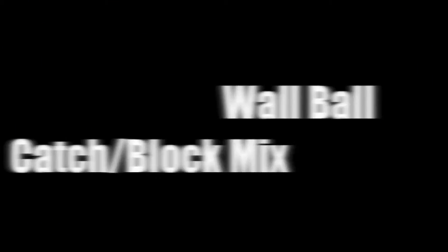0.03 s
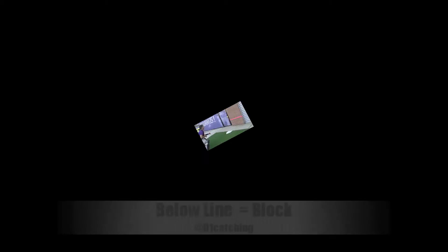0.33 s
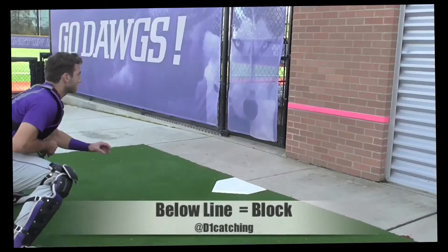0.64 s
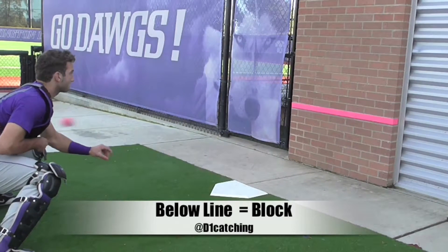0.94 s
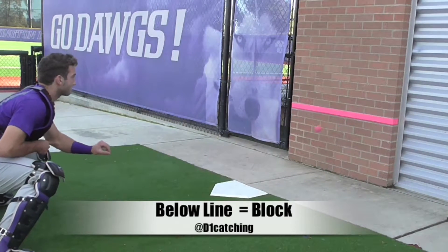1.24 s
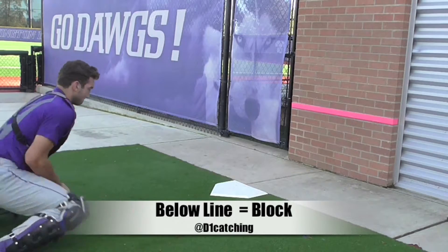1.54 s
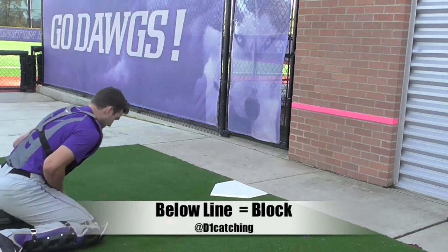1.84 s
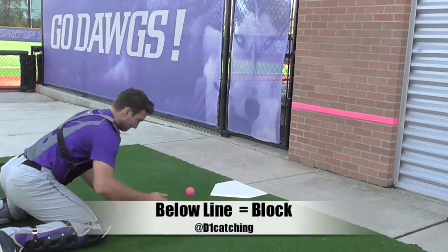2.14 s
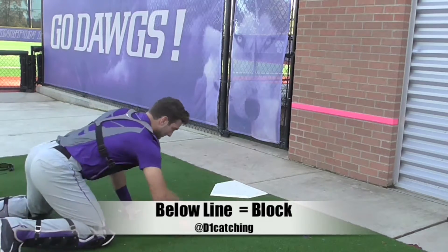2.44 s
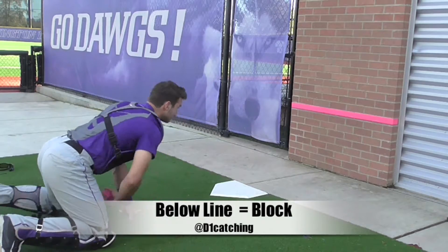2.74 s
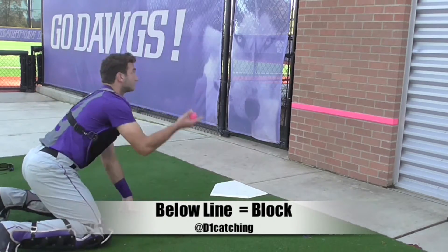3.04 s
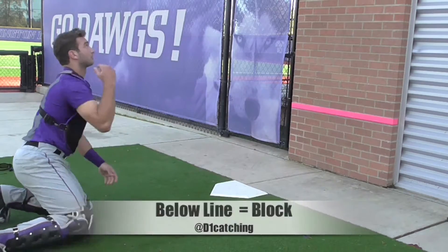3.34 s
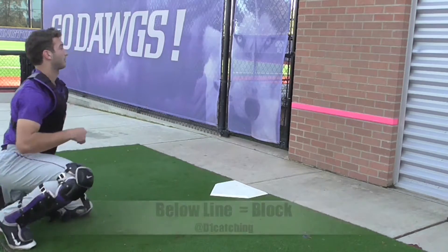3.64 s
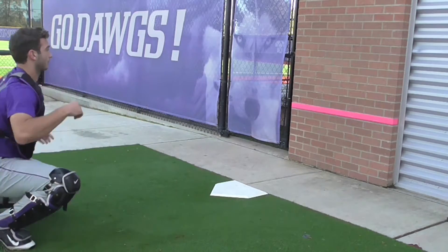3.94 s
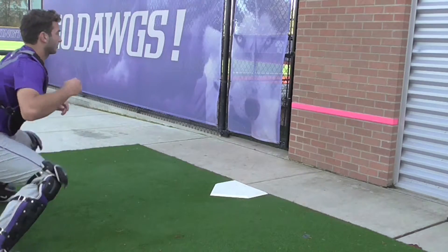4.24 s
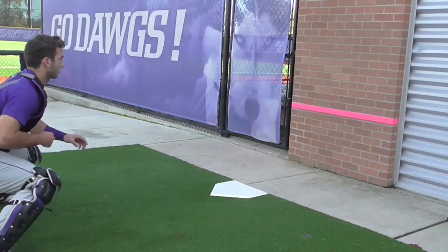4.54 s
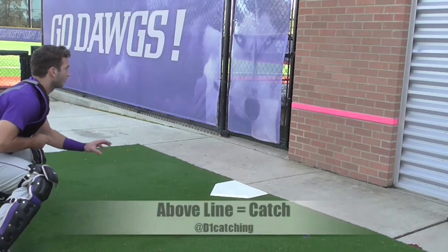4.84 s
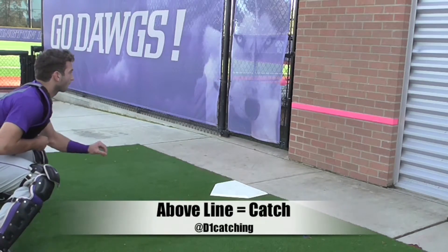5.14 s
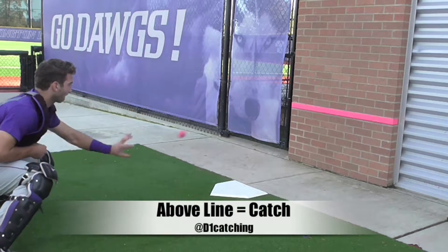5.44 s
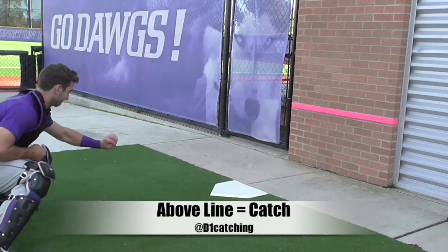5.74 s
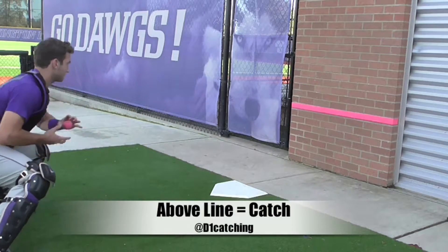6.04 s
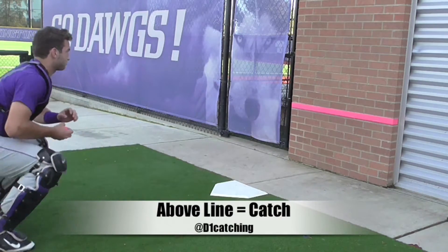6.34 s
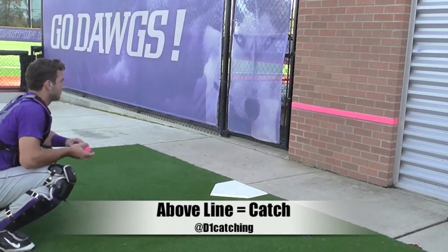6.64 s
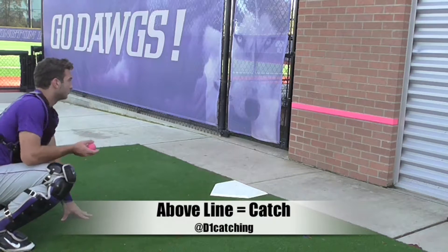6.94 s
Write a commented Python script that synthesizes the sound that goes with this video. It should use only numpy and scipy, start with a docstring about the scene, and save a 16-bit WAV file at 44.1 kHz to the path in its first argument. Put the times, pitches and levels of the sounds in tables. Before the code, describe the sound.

Two sharp rubber ball pops against a wall, with knocks, turf scuffs, rustling gear and a light catch over a distant rumble.

```python
"""Outdoors in a turfed yard, a catcher throws a small rubber ball at a brick wall twice.
The ball snaps onto the brick, flattens with a thump and rings as it springs back into shape.
The first rebound skips off the turf and is blocked as he slides onto his knees; the second is caught
bare-handed. Shoes and shin guards scuff the turf and cloth rustles over his pads. Fence and walls
echo it all, over a distant rumble and a low machine hum."""
import sys
import numpy as np
from scipy import signal
from scipy.fft import rfft, irfft
from scipy.io import wavfile

SR = 44100
rng = np.random.default_rng(int(sys.argv[2]) if len(sys.argv) > 2 else 0)


def put_to_file(sound):
    """Save the sound as 16-bit audio at rate SR, in the file named by the first command-line argument."""
    columns = np.atleast_2d(sound).T  # one column per channel
    safe = np.clip(columns, -1, 1)
    whole_steps = np.round(safe * 32767)
    wavfile.write(sys.argv[1], SR, whole_steps.astype(np.int16))


N = 308700
T = np.arange(N) / SR


def amp(db):
    """Decibels to gain."""
    return 10 ** (np.asarray(db) / 20)


def unit(x):
    """Scales to an rms of one."""
    return x / np.sqrt(np.mean(x ** 2) + 1e-20)


def curve_at(points, hz):
    """Reads a curve of (frequency, value) points on a log-frequency axis."""
    point_hz, value = np.transpose(points)
    return np.interp(np.log(hz + 1), np.log(point_hz), value)


def add(mix, start_s, sound):
    """Mixes a sound in at a time."""
    part = mix[..., max(round(start_s * SR), 0):][..., :sound.shape[-1]]
    part += sound[..., :part.shape[-1]]


def drift(rate_hz):
    """Smooth random modulation with an rms of one, rolling off above rate_hz."""
    hz = np.fft.rfftfreq(N, 1 / SR)
    return unit(irfft(rfft(rng.standard_normal(N)) * np.exp(-(hz / rate_hz) ** 2), N))


def spread(spectra, hz):
    """Turns two unrelated spectra into left and right, alike in the bass and wider in the treble."""
    # stereo image: (frequency [Hz], left-right correlation [0..1])
    correlation = [(100, 0.98), (1000, 0.78), (2000, 0.64), (5000, 0.73), (12000, 0.32)]
    alike = np.clip(curve_at(correlation, hz), 0, 1)
    mid, side = spectra[0] * np.sqrt((1 + alike) / 2), spectra[1] * np.sqrt((1 - alike) / 2)
    return np.array([mid + side, mid - side])


def coloured_noise(eq, excitation=1):
    """Stereo noise through an EQ curve, its strength following the excitation."""
    hz = np.fft.rfftfreq(N, 1 / SR)
    spectra = rfft(rng.standard_normal((2, N)) * excitation) * amp(curve_at(eq, hz))
    return unit(irfft(spread(spectra, hz), N))


def mode(db, hz, rise, t60):
    """One damped vibration that swells while the contact lasts; rise and t60 in seconds."""
    t = np.arange(SR // 10) / SR
    envelope = (1 - np.exp(-(t / rise) ** 2)) * amp(-60 * t / t60)
    return amp(db) * envelope / envelope.max() * np.sin(2 * np.pi * hz * t)


def crack(db, t60, tilt_db):
    """The short bright burst of two surfaces meeting, tilted by tilt_db per octave above 1 kHz."""
    # contact noise before the tilt: (frequency [Hz], relative level [dB])
    contact_eq = [(600, -43), (1800, -5), (2900, -4), (4300, 3), (6500, -2.5), (10000, 0.5), (15500, -8)]
    t, hz = np.arange(SR // 10) / SR, np.fft.rfftfreq(SR // 10, 1 / SR)
    colour = amp(curve_at(contact_eq, hz) + tilt_db * np.log2(np.maximum(hz, 1000)))
    spectra = rfft(rng.standard_normal((2, len(t)))) * colour
    burst = unit(irfft(spread(spectra, hz), len(t)))
    return burst * amp(db - 60 * t / t60)


def distant_tone(hz, waver_hz=.5, flutter_db=1.5):
    """A far-off sine that wavers in pitch and level."""
    cycles = np.cumsum(hz + waver_hz * drift(4.46)) / SR
    return unit(np.sin(2 * np.pi * cycles) * amp(flutter_db * drift(5.2)))


def ambience(rumble_db=-39, hum_growth_db_per_s=1.18, drone_hz=89.9):
    """Distant rumble, a machine hum that slowly grows, and a lower drone that comes and goes."""
    # distant rumble: (frequency [Hz], relative level [dB])
    rumble_eq = [(20, -36), (35, -15), (50, -10), (80, -2.5), (160, 1), (300, -4.5), (520, -9),
                 (850, -11.5), (1250, -18), (1550, -21), (1900, -25), (2800, -37.5), (4600, -35.5),
                 (7000, -41), (15500, -43.5)]
    # far machinery: (frequency [Hz], starting level [dB])
    hum_tones = [(106.5, -50.5), (188, -58.5)]
    # swells of the drone: (peak time [s], length [s], level [dB])
    drone_swells = [(1.35, 1.0, -43.5), (1.99, 0.49, -40), (3.97, 0.46, -39.5), (4.612, .55, -40),
                    (6.712, 0.78, -39)]
    rumble = amp(rumble_db) * coloured_noise(rumble_eq, amp(0.66 * drift(15.0)))
    hum = sum(amp(db + hum_growth_db_per_s * T) * distant_tone(hz) for hz, db in hum_tones)
    swells = sum(amp(db) * np.cos(np.pi * np.clip((T - peak) / length, -.5, .5)) ** 2
                 for peak, length, db in drone_swells)
    return rumble + hum + swells * distant_tone(drone_hz)


def clothes(attack_s=0.059, release_s=0.062, fidget_db=-64):
    """Each move slides cloth over the pads with a soft, uneven swish."""
    # body moves: (start [s], end [s], level [dB])
    moves = [(0.417, .95, -58), (0.985, 1.077, -47.5), (1.33, 1.843, -47), (1.954, 2.18, -52.5),
             (2.356, 2.608, -46.5), (2.82, 3.38, -50.5), (3.478, 3.584, -52.5), (3.74, 4.03, -51),
             (4.14, 4.423, -49.5), (4.497, 4.734, -51.5), (4.95, 5.093, -47.5), (5.42, 5.7, -56),
             (6.17, 6.73, -51)]
    # rubbing cloth: (frequency [Hz], relative level [dB])
    cloth_eq = [(300, 2.5), (1200, 10.5), (2000, 6), (2900, -3), (4700, 2), (7000, -6), (12000, -4.5),
                (14300, -13), (15600, -30)]
    power = amp(fidget_db) ** 2  # cloth never lies quite still
    for start, end, db in moves:
        attack = (1 + np.tanh((T - start) / attack_s)) / 2
        release = (1 - np.tanh((T - end) / release_s)) / 2
        power = power + amp(db) ** 2 * attack * release
    return np.sqrt(power) * coloured_noise(cloth_eq, amp(drift(38)))


def scuffs(edge_share=.16, preroll_s=.08):
    """Each drag swells and fades; it flicks turf blades, scrapes the sole or pad and loads the mat."""
    # shoes and shin guards on turf: (start [s], end [s], hiss [dB], scrape [dB], weight [dB])
    drags = [(1.389, 1.426, -44, -39, -35), (1.462, 1.527, -43.5, -47.5, -42.5),
             (1.514, 1.55, -36.5, -41, -33.5), (1.554, 1.6, -39.5, -36.5, -36.5),
             (1.606, 1.645, -46, -46, -33), (1.663, 1.711, -41, -35, -27), (1.68, 1.77, -39.5, -35, -36),
             (2.267, 2.336, -52, -46, -66), (2.981, 3.033, -71, -41, -59), (3.266, 3.367, -50.5, -43, -44),
             (3.69, 3.746, -50, -53, -52), (3.8, 3.938, -54, -53.5, -60),
             (4.146, 4.211, -43.5, -43.5, -41.5), (4.284, 4.299, -40, -42, -37.5),
             (4.308, 4.372, -43.5, -47.5, -40.5), (4.382, 4.394, -51, -42, -38.5),
             (6.152, 6.176, -50.5, -51, -65), (6.239, 6.317, -48.5, -54, -50),
             (6.372, 6.434, -47.5, -40, -43), (6.444, 6.498, -51, -52.5, -51),
             (6.953, 6.983, -52, -53.5, -60)]
    # flicked turf blades: (frequency [Hz], relative level [dB])
    hiss_eq = [(1000, -35), (2800, -2.5), (4500, 1), (7000, -5), (11000, -4.5), (14300, -8), (15600, -31)]
    # scraping sole or pad: (frequency [Hz], relative level [dB])
    scrape_eq = [(300, -11), (800, -6.5), (1500, 10), (2100, 6.5), (3000, -6), (6000, -15.5)]
    # the mat under load: (frequency [Hz], relative level [dB])
    weight_eq = [(50, -38), (130, -8), (300, -8.5), (700, -5.5), (1200, -10.5), (3000, -42)]
    power = np.zeros((3, N))
    t = np.arange(SR // 3) / SR - preroll_s
    for start, end, *layer_db in drags:
        length = end - start
        edge_s = edge_share * length
        attack = (1 + np.tanh(t / edge_s)) / 2
        release = (1 - np.tanh((t - length) / edge_s)) / 2
        add(power, start - preroll_s, amp(layer_db)[:, None] ** 2 * attack * release)
    hiss, scrape, weight = np.sqrt(power)
    blades = amp(1.6 * drift(600) + .8 * drift(60))  # they catch and let go in quick, uneven bunches
    return (hiss * coloured_noise(hiss_eq, blades)
            + scrape * coloured_noise(scrape_eq, blades)
            + weight * coloured_noise(weight_eq))


def contacts():
    """Knocks and ticks of the skip off the turf, the block, the dribble, the catch and the gear."""
    # soft knocks of ball, pads and knees: (time [s], level [dB], pitch [Hz], rise [s], t60 [s])
    knocks = [(1.4691, -14.5, 1240, 0.0048, 0.023), (1.481, -21.5, 1225, 0.0033, 0.018),
              (1.5445, -14, 840, 0.00054, 0.0094), (1.6056, -16.5, 307, 0.0027, 0.017),
              (1.6623, -14, 228, 0.00081, 0.013), (1.668, -22, 473, 0.00052, 0.027),
              (1.6815, -24, 656, 0.0018, 0.032), (1.692, -11.5, 326, 0.00055, 0.012),
              (1.6948, -18.5, 883, 0.0021, 0.018), (1.705, -12.5, 625, 0.0011, 0.012),
              (1.9444, -22.5, 990, 0.00029, 0.012), (1.9533, -25, 950, 0.0007, 0.011),
              (2.397, -32.5, 980, 0.0041, .035), (2.468, -34, 964, 0.0046, .035),
              (5.592, -32, 480, .001, 0.025), (5.593, -24, 930, 0.00039, 0.016),
              (5.5924, -32, 1630, .0005, 0.01), (5.6017, -28, 910, .001, 0.011)]
    # sharp ticks of ball, hand and buckles: (time [s], level [dB], t60 [s], tilt [dB/octave])
    ticks = [(1.692, -24.5, 0.023, 8), (1.945, -37, 0.024, -6), (1.957, -41, 0.057, -15),
             (2.1009, -42, .012, -8), (2.2251, -42, 0.015, 11), (2.5375, -36.5, 0.011, -10),
             (2.992, -36, 0.022, -12), (4.3398, -29, .007, 7), (4.353, -31, .008, 7),
             (4.388, -39, 0.0095, -15), (4.401, -35.5, 0.011, 4), (5.591, -34, 0.032, 7),
             (5.594, -33, 0.025, -16), (5.604, -33.5, 0.052, -9), (6.127, -42, 0.0096, 2),
             (6.4684, -34, 0.011, 5)]
    out = np.zeros((2, N))
    for start, *knock in knocks:
        add(out, start, mode(*knock))
    for start, *tick in ticks:
        add(out, start, crack(*tick))
    return out


def wall_hits(ground_echo_hz=5200):
    """The ball snaps onto the brick, flattens with a thump, and rings as it springs back into shape."""
    # ball on brick: (time [s], slap [dB], slap [Hz], ring [dB], ring [Hz], thump [dB], overtones [dB],
    # overtone stretch [ratio], click [dB], click [Hz], ground echo [dB], grit [dB])
    hits = [(1.2762, -3, 1110, -2.5, 873, -6.5, -16, 0.87, -8, 10100, -15, -22.5),
            (5.3263, -5.5, 988, -1.5, 852, -11.5, -13, 0.96, -15, 7600, -18, -24)]
    # the ball's overtones: (frequency before stretch [Hz], relative level [dB], t60 [s])
    overtones = [(1530, 6, 0.017), (1830, -9, 0.033), (2390, -17, 0.012), (3380, -6, 0.01),
                 (4530, -17, 0.022), (5670, -16.5, 0.017)]
    out = np.zeros((2, N))
    for (start, slap_db, slap_hz, ring_db, ring_hz, thump_db, overtone_db, stretch,
         click_db, click_hz, ground_echo_db, grit_db) in hits:
        add(out, start, mode(slap_db, slap_hz, rise=0.00049, t60=0.019))
        for hz, db, t60 in overtones:
            add(out, start, mode(overtone_db + db, hz * stretch, rise=0.00014, t60=t60))
        add(out, start + 0.0012, mode(thump_db, hz=253, rise=0.0016, t60=0.013))
        add(out, start + 0.00224, mode(ring_db, ring_hz, rise=0.0045, t60=0.017))
        # a sharp click as the ball meets the brick, then its reflection off the ground about 1 ms later
        add(out, start + 0.00037, mode(click_db, click_hz, rise=.00002, t60=0.00094))
        add(out, start + 0.001206, mode(ground_echo_db, ground_echo_hz, rise=.00002, t60=0.00095))
        add(out, start, crack(grit_db, t60=0.032, tilt_db=-5.5))
    return out


def with_wall_echo(sound, delay_s=.0105, echo_db=-11):
    """The direct sound plus its quick reflection off the nearby wall."""
    out = sound.copy()
    add(out, delay_s, amp(echo_db) * sound)
    return out


def yard_reverb(send, tail_db=-18, build_s=0.036, taps_per_s=3000):
    """A few echoes from fence and walls, then a thin tail from the buildings around."""
    # early reflections off fence and walls: (delay [s], level [dB])
    echoes = [(0.0111, -28), (0.017, -25), (0.038, -40), (.047, -34), (.098, -46), (0.129, -33)]
    # colour of the scattered tail: (frequency [Hz], relative level [dB])
    tail_eq = [(150, -3), (400, 16), (780, -2.5), (1000, -1), (1450, 2.5), (2200, 1), (4300, 1.5),
               (6000, 10), (14000, -2.5)]
    # decay of the tail: (frequency [Hz], t60 [s])
    tail_t60 = [(100, 0.79), (900, 1), (4000, 1), (14000, 0.46)]
    taps = rng.standard_normal((2, SR)) * (rng.random(SR) < taps_per_s / SR)
    taps = irfft(spread(rfft(taps), np.fft.rfftfreq(SR, 1 / SR)), SR)
    hz, t, bands = signal.stft(taps, SR, nperseg=256)
    decay = amp(curve_at(tail_eq, hz)[:, None] - 60 * t / curve_at(tail_t60, hz)[:, None])
    build_up = 1 - np.exp(-t / build_s)
    response = signal.istft(bands * decay * build_up, SR, nperseg=256)[1]
    response *= amp(tail_db) / np.linalg.norm(response[0])
    soft_click = signal.windows.hann(5) / 2
    for delay, db in echoes:
        add(response, delay, amp(db) * soft_click)
    return signal.fftconvolve(send, response, axes=1)[:, :N]


def scene(catcher_send_db=-7):
    """Ball and catcher in the yard, the ball a little to the right; the wall hits stir the most echo."""
    ball = wall_hits() * amp([[-.7], [.7]])
    catcher = contacts() + with_wall_echo(scuffs() + clothes())
    reverb = yard_reverb(ball + amp(catcher_send_db) * catcher)
    bed = ambience() * amp([[-.4], [.4]])
    return ball + catcher + reverb + bed


def record(dry, knee=4, low_cut_hz=45, high_cut_hz=15600):
    """Master chain: soft clip, low cut, fade-in and a steep high cut."""
    rounded = dry / (1 + abs(dry) ** knee) ** (1 / knee)
    thinned = signal.sosfilt(signal.butter(2, low_cut_hz, "high", fs=SR, output="sos"), rounded)
    fade_in = np.interp(T, [.3, .42, .6, .8], [0, .2, .75, 1])
    high_cut = signal.firwin(401, high_cut_hz, window=("kaiser", 9), fs=SR)
    return signal.oaconvolve(fade_in * thinned, high_cut[None], "same")


dry = scene()
out = record(dry)
put_to_file(out)
```